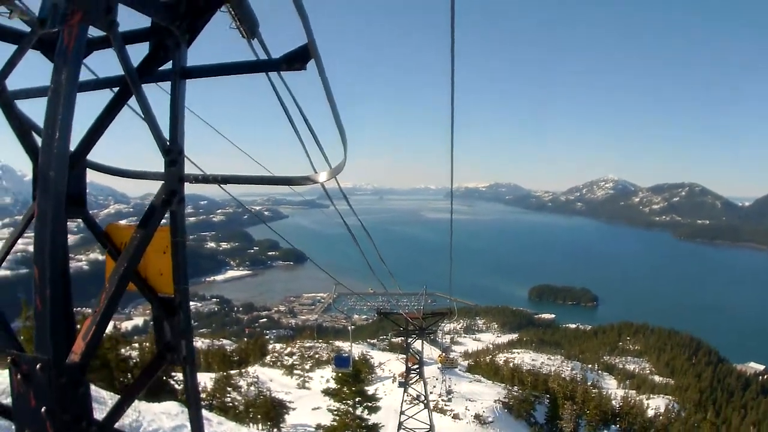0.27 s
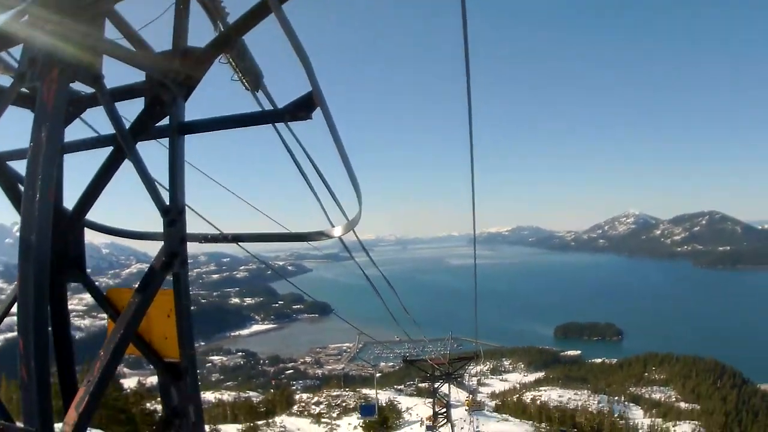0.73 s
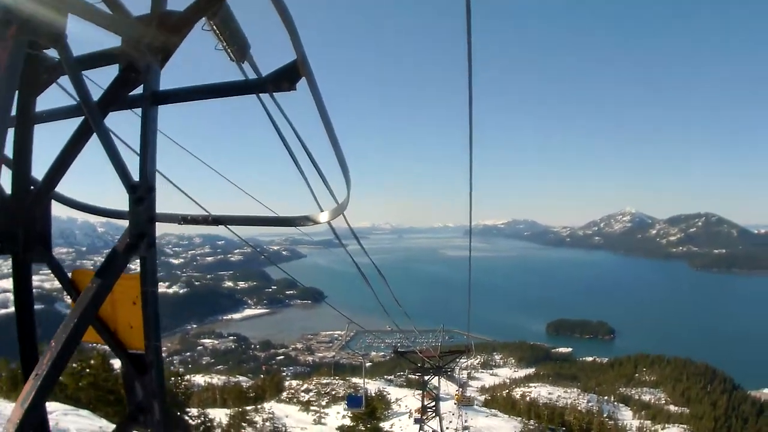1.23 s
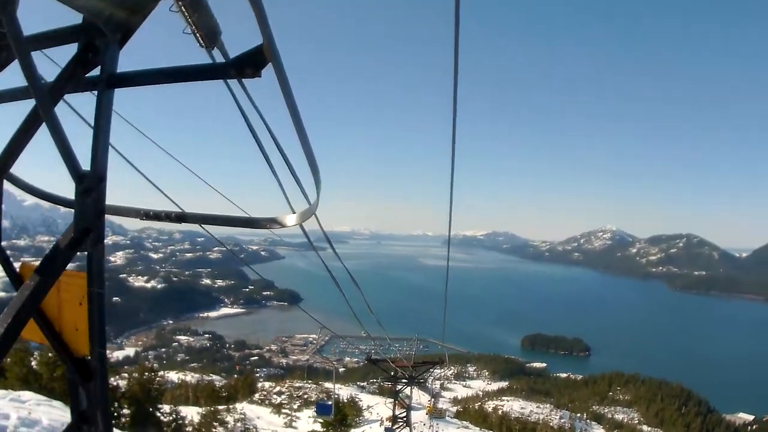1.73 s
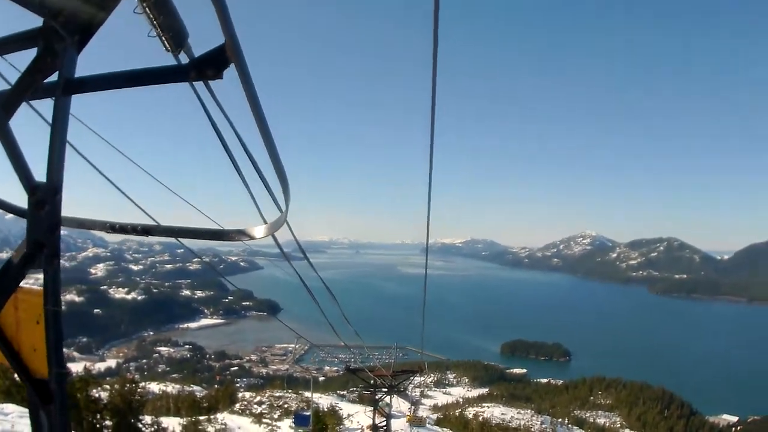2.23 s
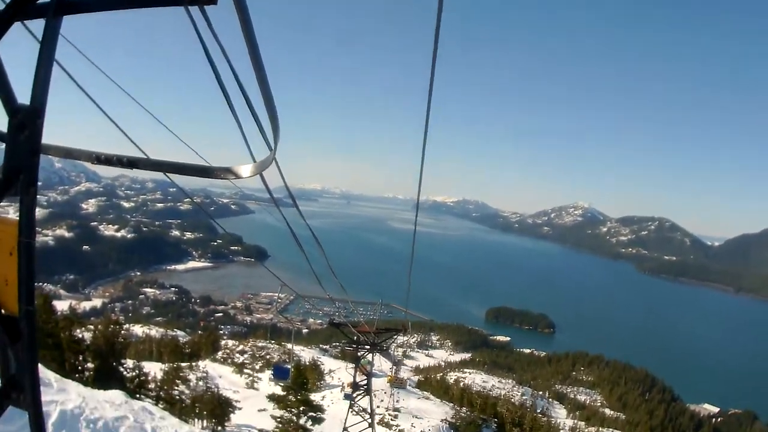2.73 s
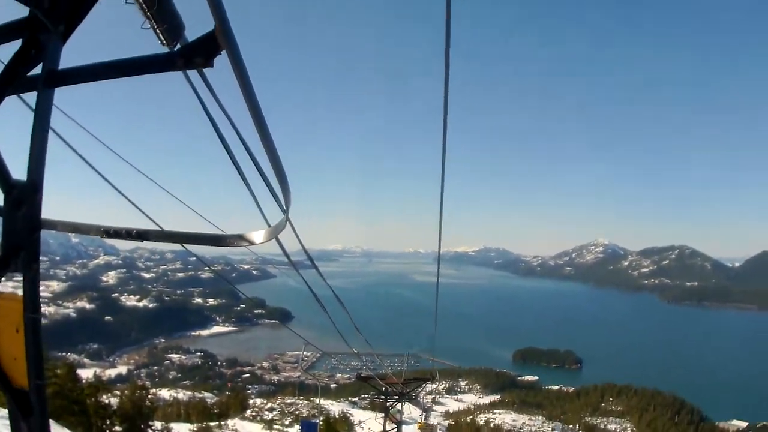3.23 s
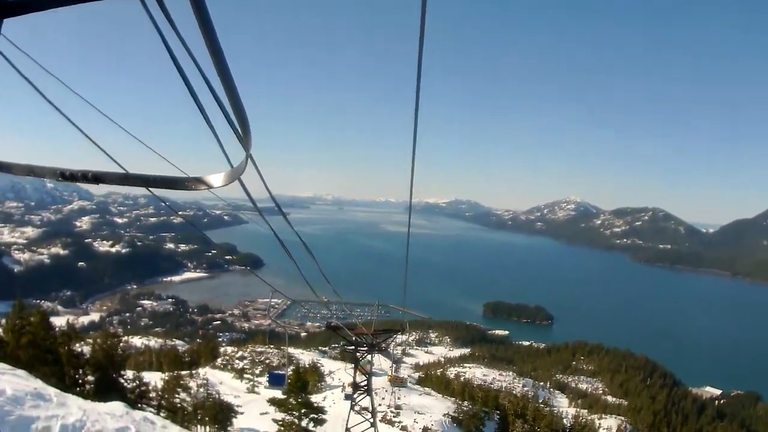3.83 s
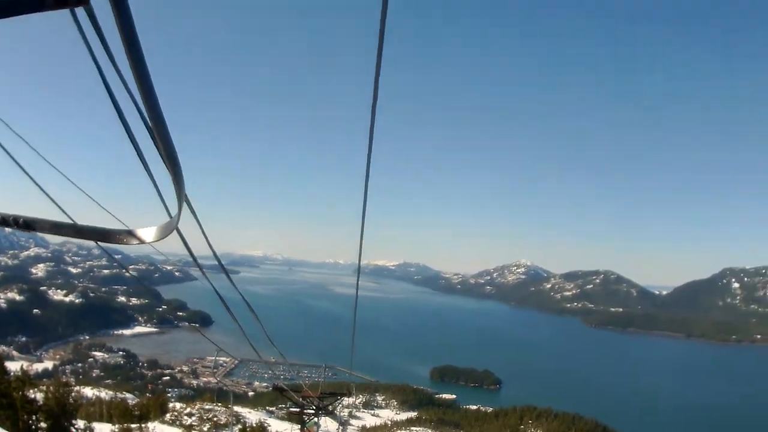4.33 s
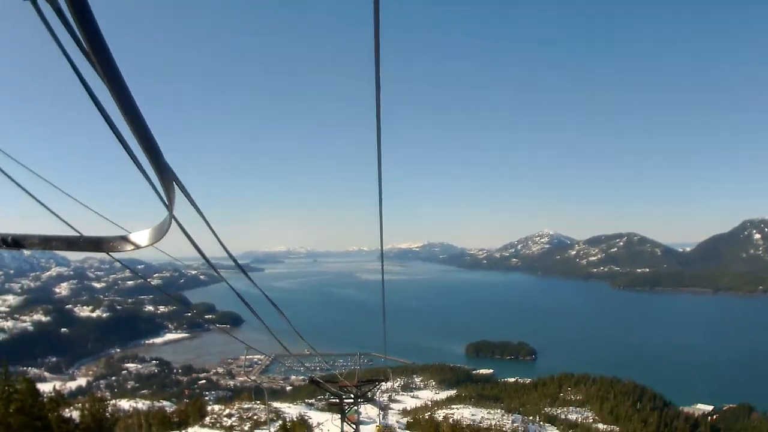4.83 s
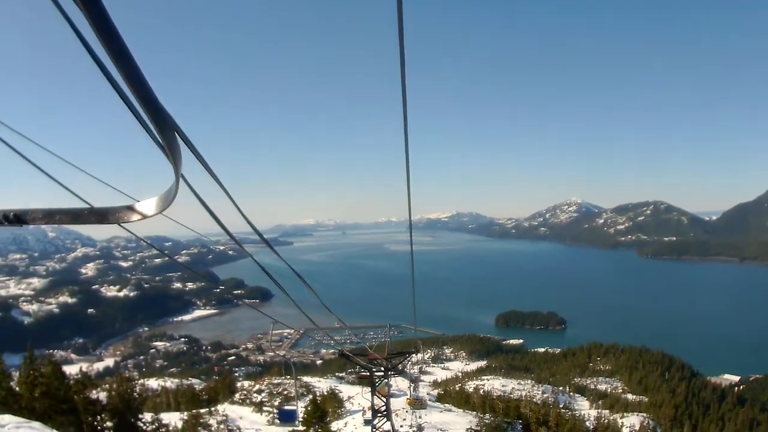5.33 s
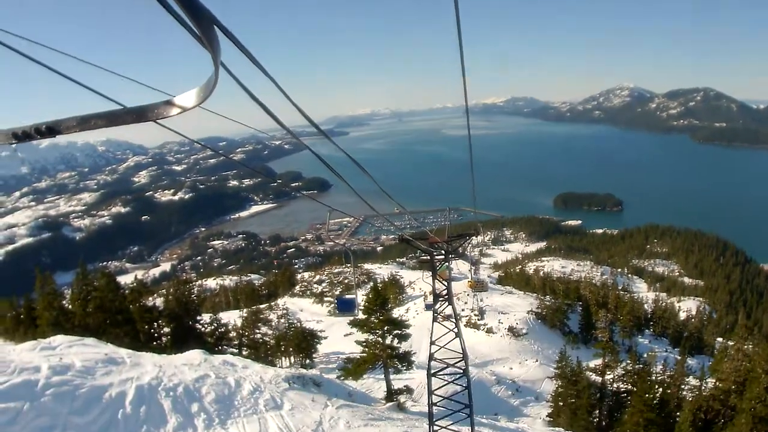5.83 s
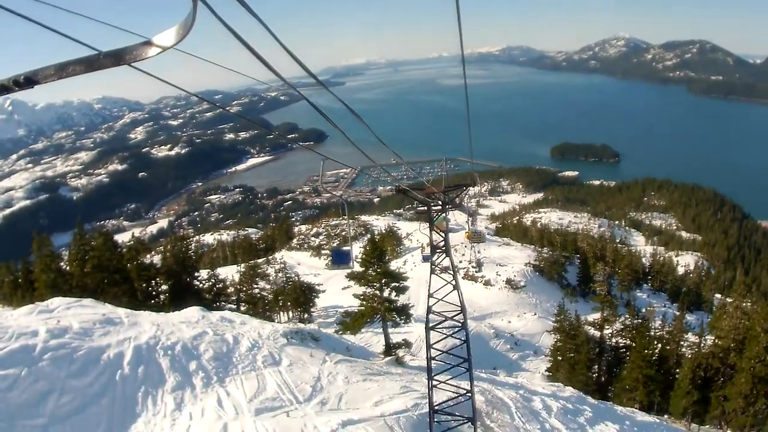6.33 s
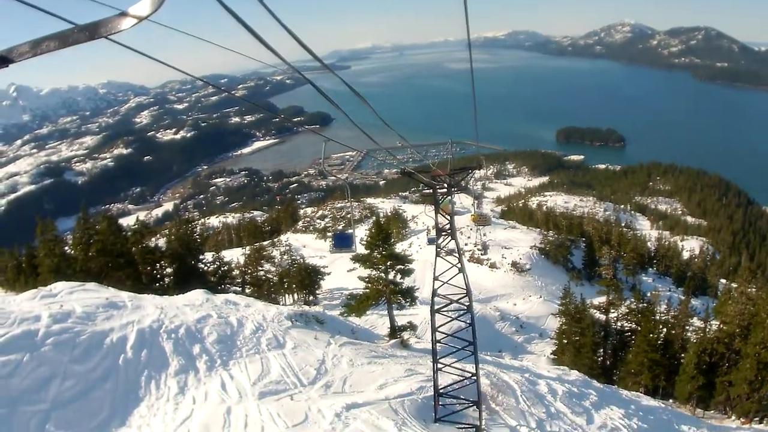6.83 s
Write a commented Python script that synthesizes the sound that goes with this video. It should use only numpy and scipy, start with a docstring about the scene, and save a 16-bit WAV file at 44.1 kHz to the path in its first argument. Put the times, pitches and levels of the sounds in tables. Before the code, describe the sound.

Inside a mountain cable lift, a small mechanism right by the handheld microphone whirrs continuously, fluttering quickly with faint whines. After a few light ticks, the cabin meets the tower wheels: dull thumps, sharp metallic ticks, short rumbles and scrapes, densest in the middle. The jolts thin out and the whirr is left alone with slight low wind. Dry open air, no echo.

```python
"""On board a lift cabin as it rolls over the wheels of a tower, heard from a hand-held camera.
A small mechanism close to the microphone whirrs all along: noise rings its housing, with two buzz
rates, a throb at their beat of 13 a second, and thin whines that come and go.
While the wheels pass, jolts arrive as dull thumps (pushes into damped modes), sharp ticks (short noise
bursts), low rumble and bursts of scraping (random clicks). A little low, lumpy wind on the microphone."""
import sys
import numpy as np
from scipy import signal
from scipy.io import wavfile
from scipy.ndimage import uniform_filter1d

SR = 44100
rng = np.random.default_rng(int(sys.argv[2]) if len(sys.argv) > 2 else 0)


def store_pcm(level_fs):
    """Save levels as 16-bit WAV."""
    pcm = np.round(np.clip(level_fs, -1, 1) * 32767).astype(np.int16)
    wavfile.write(sys.argv[1], SR, np.atleast_2d(pcm).T)


N = 312228

# The two buzz rates of the mechanism, in Hz; their difference is the throb.
BUZZ_HZ = (86.53, 73.41)
THROB_HZ = BUZZ_HZ[0] - BUZZ_HZ[1]
# Jolts and drags over the wheels. Each row: time full level is reached in seconds, hold in seconds,
# scrape level in dB, rumble level in dB.
JOLTS = [(0.332, 0.097, -55, -62), (1.396, 0.0071, -45, -44), (1.555, 0.011, -60, -50),
         (1.694, 0.031, -54, -47), (1.73, .26, -52, -51), (1.767, .02, -51, -44), (2.028, 0.021, -44, -38),
         (2.072, 0.028, -35.5, -69), (2.142, 0.14, -47, -55.5), (2.143, 0.0099, -53, -54),
         (2.259, 0.048, -39, -66), (2.439, .03, -58, -46.5), (2.482, 0.072, -50, -33),
         (2.614, .29, -47, -54.5), (2.63, 0.056, -45, -41), (2.745, 0.031, -39, -46.5),
         (2.983, 0.071, -37, -43), (2.996, 0.038, -30, -43), (3.07, 0.186, -42.5, -45.5),
         (3.269, 0.059, -36.5, -35), (3.447, 0.047, -40.5, -40), (3.674, 0.028, -42.5, -47.5),
         (3.832, .03, -51.5, -50), (3.883, .025, -63, -43.5), (4.031, 0.044, -51, -47.5),
         (4.098, .1, -59, -62.5)]


def from_db(db):
    """Decibels to gain."""
    return 10 ** (np.asarray(db) / 20)


def rms_one(x):
    """Scale to rms 1."""
    return x / np.sqrt(np.mean(x ** 2) + 1e-20)


def in_time(rows):
    """Columns of a curve whose first column is seconds, one value per sample."""
    seconds, *columns = np.transpose(rows)
    return [np.interp(np.arange(N) / SR, seconds, column) for column in columns]


def at_hz(points, hz, axis=1):
    """A column of a table read on a log-frequency axis."""
    points = np.array(points)
    return np.interp(np.log(hz), np.log(points[:, 0]), points[:, axis])


def drift(rate_hz):
    """Slow random wander of spread 1: noise through two equal low-pass poles at rate_hz."""
    step = 40   # samples between the computed points
    r = np.exp(-2 * np.pi * rate_hz * step / SR)
    noise = rng.standard_normal(N // step + 2002)
    slow = signal.lfilter([1], [1, -2 * r, r * r], noise)[2000:]   # drop the filter's run-in
    return np.interp(np.arange(N) / step, np.arange(len(slow)), rms_one(slow - slow.mean()))


def band_pass(x, low_hz, high_hz):
    """Keep what lies between two frequencies, with gentle skirts."""
    return signal.sosfilt(signal.butter(2, [low_hz, high_hz], "band", fs=SR, output="sos"), x)


def bands(x, count):
    """Third-octave slices from 10.5 kHz down, from two signals in turn, with centre frequencies."""
    edges = 10500 * 2 ** (-np.arange(count + 1) / 3)
    for k, (high, low) in enumerate(zip(edges, edges[1:])):
        yield np.sqrt(low * high), band_pass(x[k % 2], low, high)


def resonance(x, hz, width_hz):
    """One resonance with gain 1 on top."""
    r = np.exp(-np.pi * width_hz / SR)
    feedback = [1, -2 * r * np.cos(2 * np.pi * hz / SR), r * r]
    return signal.lfilter(np.array([1, 0, -1]) * (1 - r * r) / 2, feedback, x)


def mode(push, hz, t60):
    """A unit push sets a sine ringing from height 1, falling 60 dB in t60 seconds."""
    r = from_db(-60 / (t60 * SR))
    w = 2 * np.pi * hz / SR
    return signal.lfilter([0, np.sin(w)], [1, -2 * r * np.cos(w), r * r], push + 1e-18)


def wind():
    """Lumpy low noise: wind on the microphone."""
    # Each row: time in seconds, level in dB before the wander.
    gusts = [(0.0, -67), (.6, -86), (1.3, -88), (1.6, -66.5), (2.5, -76), (2.9, -63.5), (3.5, -64.5),
             (4.5, -73.5), (5.2, -71), (7.08, -82)]
    low = band_pass(rng.standard_normal(N), 30, 140)
    wander_db = drift(2.4)
    return from_db(in_time(gusts)[0] + wander_db) * rms_one(low)


def throb(hz, depth):
    """Gain that swings at the beat rate, mostly deeper in the treble, and ripples at both buzz rates."""
    # Pulsing by pitch. Each row: frequency in Hz, throb depth in dB before the depth factor,
    # throb lag in turns, depth of each buzz ripple in dB.
    pulse_by_pitch = [(302, .8, .2, 1), (1300, 1.8, .2, .8), (1650, 1.6, .15, .8), (1850, 4.2, .08, .64),
                      (2050, 3.4, .15, .7), (2400, 3.2, .1, 1), (4000, 3.3, .08, .4),
                      (7000, 4.8, .03, 1.34), (9200, 6.2, -.04, 1.7)]
    # Starting angles of the two buzzes, in turns.
    buzz_turn = (0.4, -0.58)
    throb_turn = -.31   # starting angle in turns
    t = np.arange(N) / SR
    angle = 2 * np.pi * (THROB_HZ * t + throb_turn - at_hz(pulse_by_pitch, hz, axis=2))
    buzz = sum(np.cos(2 * np.pi * (rate * t + start)) for rate, start in zip(BUZZ_HZ, buzz_turn))
    swing = np.cos(angle) + 0.14 * np.sin(2 * angle)
    swing_db = depth * at_hz(pulse_by_pitch, hz) * swing
    buzz_db = at_hz(pulse_by_pitch, hz, axis=3) * buzz
    return from_db(swing_db + buzz_db)


def whines():
    """Noise twice through a narrow resonance, evened so that mainly the pitch wavers, fading in and out."""
    # Each row: frequency in Hz, middle of the fade in and of the fade out in seconds,
    # level in dB before fade and throb.
    whine_rows = [(1720, -2, 3.47, -55.5), (1833, -1.5, 1.4, -57), (2285, .7, 1.7, -57.5),
                  (1340, 2.5, 3.4, -52.5), (1398, 1, 6.6, -62.5), (1832, 1.5, 5.5, -58.5),
                  (2102, 5, 4.7, -50.5), (1304, 4, 7.5, -62.5), (2432, 2, 7.1, -63.5),
                  (1828, 5.8, 7.5, -57.5), (645, 3.5, 7.5, -71)]
    width_hz, even_s, fade_s = 6, 0.022, 0.4   # even_s: time over which the level is evened
    out, t = np.zeros(N), np.arange(N) / SR
    noise = rng.standard_normal(N)
    for hz, start, end, db in whine_rows:
        fade = np.clip(np.minimum(t - start, end - t) / fade_s + .5, 0, 1)
        tone = rms_one(resonance(resonance(noise, hz, width_hz), hz, width_hz))
        local_power = uniform_filter1d(tone ** 2, size=round(even_s * SR))
        even = tone / np.sqrt(0.2 + local_power)
        out += from_db(db) * fade * rms_one(even)
    return out


def whirr():
    """Pulsing friction noise rings the housing over a smoother bed; thin whines pulse along."""
    # Each row: time in seconds, level of the ringing in dB, treble in dB (above 5 kHz),
    # throb depth factor above 3 kHz.
    whirr_curve = [(0.0, -47.5, 2, .45), (1.22, -47, 0, .45), (1.73, -45.5, -2.5, .9),
                   (2.13, -44, -5, 0.74), (3.14, -45, -1, 0.45), (3.69, -47.5, -3, 0.91),
                   (4.93, -48.5, -0.5, 1.04), (5.54, -49, 0, 1.19), (7.08, -50, -2.5, 0.92)]
    # Relative spectrum of the bed. Each row: frequency in Hz, level in dB per Hz.
    bed_spectrum = [(24, -57), (40, -27), (532, -2), (640, -7.5), (806, -12), (1850, -7), (2180, -15.5),
                    (2330, -15), (4890, -15), (6750, -20), (7940, -20), (9120, -6), (10000, -33),
                    (13000, -59), (22000, -120)]
    # Housing resonances. Each row: frequency in Hz, width in Hz, relative gain in dB.
    housing = [(659, 19, -13), (1247, 19, -8.5), (1306, 44, -11), (1408, 54, -10), (1641, 37, -8.5),
               (1659, 6.1, -4), (1811, 115, -4.5), (1947, 29, -0.5), (2040, 49, -10.5), (2333, 45, -4.5),
               (2440, 33, -10.5), (2598, 88, -13), (2951, 30, -8), (3667, 102, -13), (4050, 26, -6.5),
               (4310, 120, -14), (5207, 31, -9.5), (5917, 80, -11.5), (6696, 230, -10), (7490, 116, -10),
               (8530, 254, -13.5), (9050, 110, -15.5), (8980, 220, -20.5)]
    bed_db, wander_db = -6.5, 2.5   # bed against the ringing; spread of each resonance's wander
    level_db, treble_db, high_depth = in_time(whirr_curve)
    low_depth = .35 + .42 * high_depth   # a steady part and a share of the curve
    friction = rng.standard_normal((2, N))

    def pulsing(hz):
        """Throb and treble level for one pitch."""
        depth = high_depth if hz > 3000 else low_depth
        return from_db(treble_db * (hz > 5000)) * throb(hz, depth)

    rings = np.zeros(N)
    for k, (hz, width_hz, db) in enumerate(housing):
        ring = resonance(friction[k % 2], hz, width_hz)
        rings += from_db(db + wander_db * drift(1.7)) * pulsing(hz) * ring
    bed = np.zeros(N)
    for hz, band in bands(friction[::-1], count=24):
        bed += from_db(at_hz(bed_spectrum, hz) + 0.94 * drift(8.9)) * pulsing(hz) * band
    noise = from_db(level_db) * (rms_one(rings) + from_db(bed_db) * rms_one(bed))
    # The whines throb deeper than the noise below 3 kHz, by 1.15.
    return noise + whines() * throb(1850, 1.15 * low_depth)


def body(push):
    """Heavily damped low modes, struck through a soft contact."""
    # Each row: frequency in Hz, level in dB before the band-pass, time to fall 60 dB in seconds.
    body_modes = [(258, -12.5, 0.0092), (439, 2, 0.0067), (800, -8.5, 0.0024), (1380, -9, 0.0034)]
    out = sum(from_db(db) * mode(push, hz, t60) for hz, db, t60 in body_modes)
    return band_pass(out, 190, 1800)


def grains(per_s, spread_db, count):
    """Rows of random clicks of uneven size and either sign; rms 1."""
    size_db = spread_db * np.minimum(rng.exponential(1, (count, N)), 5)
    sizes = from_db(size_db) * rng.choice([-1, 1], (count, N))
    falls = rng.random((count, N)) < per_s / SR
    return rms_one(sizes * falls) + 1e-18


def jolt_gain(levels_db):
    """Every jolt rises, holds and falls at the same rates; overlapping ones add in power."""
    rise_db_per_s, fall_db_per_s = 799, 451
    t, power = np.arange(N) / SR, 0
    for (start, hold, *_), db in zip(JOLTS, levels_db):
        before, after = np.maximum(start - t, 0), np.maximum(t - start - hold, 0)
        lost_db = rise_db_per_s * before + fall_db_per_s * after
        power = power + from_db(2 * (db - np.minimum(lost_db, 100)))   # doubled dB: power
    return np.sqrt(power)


def jolting():
    """Dense fine grains scrape; sparser pushes into the body rumble."""
    # Relative spectrum of the scraping. Each row: frequency in Hz, level in dB per Hz.
    scrape_spectrum = [(410, -47), (700, -22), (1100, -13.5), (1690, -1.5), (1820, -2), (4750, -10.5),
                       (6930, -8), (8000, -24.5), (9150, -6.5), (9670, -15.5), (10000, -34), (13000, -64),
                       (22000, -120)]
    *_, scrape_db, rumble_db = np.transpose(JOLTS)
    scrape = np.zeros(N)
    for hz, band in bands(grains(6000, 2.65, count=2), count=12):
        scrape += from_db(at_hz(scrape_spectrum, hz) + 2.7 * drift(21.0)) * band
    pushes = grains(1500, 3.4, count=1)[0]
    rumble = resonance(body(pushes), 376, 540)   # small pushes hardly move the lowest mode
    return jolt_gain(scrape_db) * rms_one(scrape) + jolt_gain(rumble_db) * rms_one(rumble)


def ticks():
    """Short bursts of noise that hold, then die, ringing a broad resonance."""
    # Each row: start in seconds, peak in dB, time to fall to 1/e in seconds, centre in Hz.
    tick_rows = [(0.163, -30.5, 0.0072, 1800), (.347, -34.5, 0.0036, 1670), (.356, -36, 0.0031, 1480),
                 (0.37, -32, 0.003, 1800), (1.393, -27, 0.0027, 1190), (2.05, -22, 0.0013, 6000),
                 (2.064, -15.5, 0.0015, 3040), (2.069, -25, 0.0018, 3000), (2.087, -28, 0.0047, 1990),
                 (2.148, -29, 0.0018, 7000), (2.19, -25, 0.0015, 2200), (2.345, -24.5, 0.00099, 5000),
                 (2.469, -19.5, 0.0027, 3370), (2.477, -20, 0.0017, 4000), (2.481, -28, 0.0018, 4200),
                 (2.492, -20, 0.0021, 5000), (2.4933, -23.5, 0.0035, 5170), (2.514, -19, 0.0017, 4800),
                 (2.517, -16.5, 0.0029, 4000), (2.847, -32, 0.0022, 5000), (2.902, -28, 0.0013, 6000),
                 (2.953, -18, 0.00076, 6000), (2.967, -36, 0.0046, 2500), (2.984, -24, 0.0014, 3020)]
    # A tick this short is as wide as it is high; longer ones ring more narrowly, by this power.
    broad_tick_s, narrowing = 0.002, 1.4
    out, t = np.zeros(N), np.arange(1500) / SR
    noises = rng.standard_normal((len(tick_rows), len(t)))
    for (start, db, length, hz), noise in zip(tick_rows, noises):
        width_hz = hz * (broad_tick_s / length) ** narrowing
        burst = resonance(noise * np.exp(-(t / length) ** 2), hz, width_hz)
        burst = resonance(burst, hz, 2 * width_hz)   # steeper skirts
        out[round(start * SR):][:len(t)] += from_db(db) * burst / np.abs(burst).max()
    return out


def thumps():
    """Single pushes into the body and the whole frame, pressure falling first."""
    # Pushes into the body. Each row: time in seconds, size of the push in dB.
    body_pushes = [(1.182, -40), (1.3896, -18.5), (1.4030, -23.5), (1.435, -31.5), (1.5477, -22),
                   (1.773, -26.5), (2.031, -34), (2.048, -23), (2.064, -18), (2.152, -29), (2.442, -26.5),
                   (2.4787, -22.5), (2.4914, -39), (2.4956, -17.5), (2.502, -21), (2.516, -16.5),
                   (2.5400, -12.5), (2.5557, -25), (2.648, -24.5), (2.679, -30), (2.785, -36),
                   (3.0137, -26), (3.275, -21.5), (3.281, -20), (3.293, -23.5), (3.299, -26), (3.304, -22),
                   (3.3111, -20), (3.316, -20), (3.349, -28), (3.46, -30), (3.4845, -26.5), (3.5034, -30),
                   (3.8947, -31), (4.2013, -36), (5.044, -35.5), (5.182, -37.5)]
    # Deep thuds of the whole frame. Each row: time in seconds, starting height in dB, frequency in Hz.
    frame_thuds = [(1.3908, -29, 148), (1.5454, -35.5, 149), (2.051, -35.5, 80.5), (2.541, -31, 123),
                   (2.783, -34.5, 163), (3.291, -29, 149), (3.307, -32, 150), (3.323, -34, 160),
                   (3.462, -27.5, 81), (3.476, -36, 150), (3.678, -41, 140), (3.862, -44, 130),
                   (5.041, -52, 130), (5.184, -46, 131)]
    thud_cycles = 3.1   # cycles to fall 60 dB
    push, frame = np.zeros(N), np.zeros(N)
    for s, db in body_pushes:
        push[round(s * SR)] -= from_db(db)
    for s, db, hz in frame_thuds:
        knock = np.zeros(N)
        knock[round(s * SR)] = 1
        frame -= from_db(db) * mode(knock, hz, thud_cycles / hz)
    return body(push) + frame


def scene():
    """Everything reaches one microphone, dry, in open air."""
    return (wind() + whirr() + jolting() + ticks() + thumps())[None]


def record(dry):
    """The microphone's side: a bass cut, a narrow dip near 8 kHz, a steep top cut and a faint hiss."""
    # Lower and upper edge of the dip, in Hz.
    dip_edges = [7780, 8250]
    low_cut_hz, top_cut_hz, hiss_db = 45, 9580, -104
    thin = signal.sosfilt(signal.butter(2, low_cut_hz, "high", fs=SR, output="sos"), dry)
    dipped = signal.sosfilt(signal.butter(2, dip_edges, "stop", fs=SR, output="sos"), thin)
    cut = signal.sosfilt(signal.ellip(12, .5, 75, top_cut_hz, fs=SR, output="sos"), dipped)
    return cut + from_db(hiss_db) * rng.standard_normal(dry.shape)


dry = scene()
out = record(dry)
store_pcm(out)
```